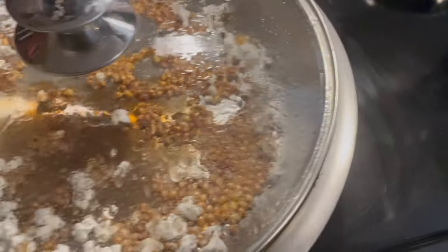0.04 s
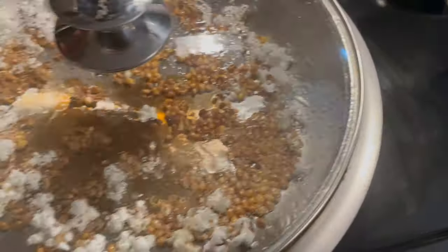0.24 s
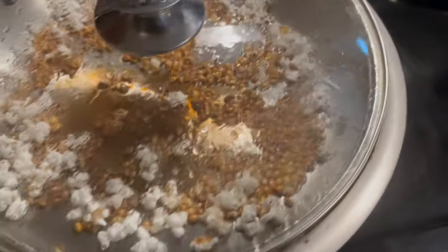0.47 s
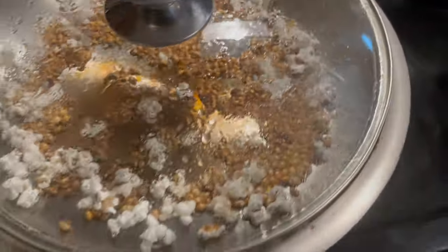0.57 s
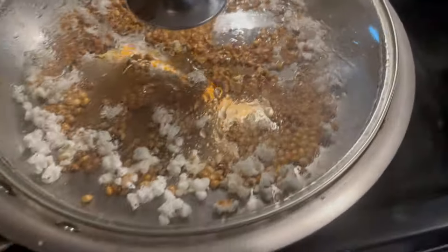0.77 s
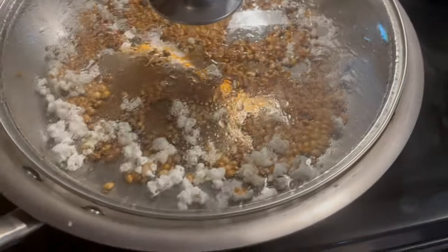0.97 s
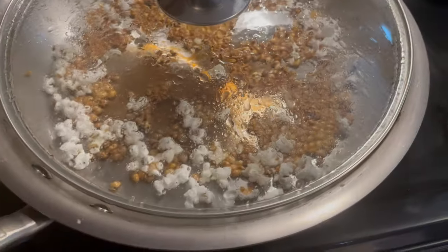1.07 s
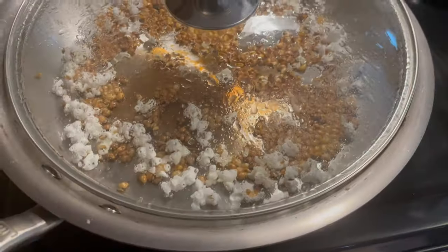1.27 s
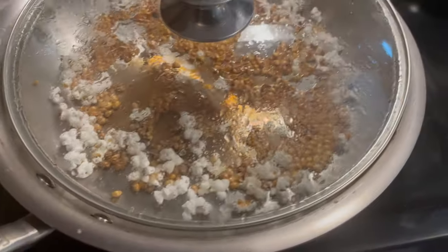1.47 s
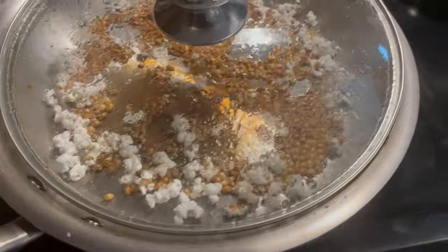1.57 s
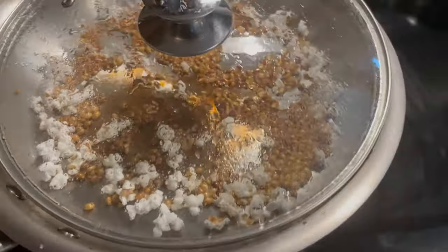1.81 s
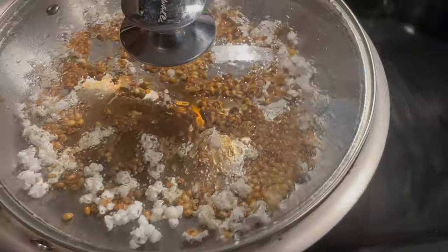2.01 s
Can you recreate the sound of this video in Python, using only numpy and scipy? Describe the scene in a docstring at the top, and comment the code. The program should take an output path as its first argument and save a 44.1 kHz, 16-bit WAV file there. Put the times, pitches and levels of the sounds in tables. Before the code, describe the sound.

Popcorn popping in a covered pan, a few crisp cracks with low thumps over faint hissing.

```python
"""Thin steam squeals over sizzling oil and a faint hum, then popcorn pops in a pan under a glass lid.
Sizzle is coloured noise with tiny bursts, squeals are narrow noise bands, spits are bright snaps with a fizz.
Each pop is a hull crack (clicks and a noise jet), a ring of pan modes and a low thump that drops in pitch.
Thrown kernels knock in quick ticks. A short kitchen tail follows; a close pair of microphone ports gives stereo."""
import sys
import numpy as np
from scipy import signal
from scipy.fft import rfft, irfft
from scipy.io import wavfile

SR = 44100
rng = np.random.default_rng(int(sys.argv[2]) if len(sys.argv) > 2 else 0)


def transcribe(u):
    """Save the signal u as a 16-bit wav file named by the first command-line argument.

    u: samples, shape (n,) or (channels, n), limited to [-1, 1]; the rate is SR.
    q: integer samples, one column per channel.
    """
    v = np.clip(np.atleast_2d(u).T, -1, 1)
    q = np.round(v * 32767).astype(np.int16)
    wavfile.write(sys.argv[1], SR, q)


N = 90404

# Modes of the covered pan. Each row: frequency in Hz, level in dB, t60 in seconds before the length factor.
PAN_MODES = [(1106, -2, .07), (1703, -4.5, .085), (2273, -2.5, .125), (2800, -8, .07), (3230, -11, .06),
             (3410, -9, .09), (3527, -7, .14), (3966, -9, .13), (4061, -4, .08), (4400, -11, .1),
             (4674, -7, .08), (4930, -10, .08), (5260, -9, .08), (5860, -13, .08), (6547, -8, .1),
             (7150, -11, .08)]
# Colour of tearing hulls and sizzle bursts. Each row: frequency in Hz, level in dB.
CRACK_COLOUR = [(200, -4), (500, -8.5), (780, -10.5), (1100, -1), (1400, -11), (2500, -5.5), (4500, -4.5),
                (5800, -3), (7600, -1.5), (10000, -0.5), (12500, 1), (14500, -5), (16500, -20)]


def amp(db):
    """Decibels to gain."""
    return 10 ** (np.asarray(db) / 20)


def evened(x):
    """Scales to an rms of 1."""
    return x / np.sqrt(np.mean(x ** 2) + 1e-20)


def read(points, hz, axis=1):
    """Interpolates one column of a table along log frequency."""
    table = np.transpose(points)
    return np.interp(np.log(hz + 1), np.log(table[0] + 1), table[axis])


def add(mix, s, sound):
    """Lays a sound into the mix at a time in seconds."""
    part = mix[:, max(round(s * SR), 0):][:, :sound.shape[-1]]
    part += sound[..., :part.shape[-1]]


def colour(x, db_of):
    """Filters by a dB function of frequency, with zero phase."""
    size = x.shape[-1]
    return irfft(rfft(x) * amp(db_of(np.fft.rfftfreq(size, 1 / SR))), size)


def times(size=8192):
    """The time axis of one short event, in seconds."""
    return np.arange(size) / SR


def burst(t, rise_s, fade_s):
    """Linear rise, exponential fade."""
    rise = np.minimum(t / max(rise_s, 1e-5), 1)
    return rise * np.exp(-np.maximum(t - rise_s, 0) / fade_s)


def ripple(size=8192):
    """A random ripple in dB over frequency: the reflections from one place between pan and lid."""
    ripple_db, spacing_hz = 0.5, 170.4
    hz = np.fft.rfftfreq(size, 1 / SR)
    knots = rng.standard_normal(1024)
    return ripple_db * np.interp(hz / spacing_hz, np.arange(len(knots)), knots)


def kitchen(x):
    """A faint room tail of decaying noise, each band dying at its own speed."""
    # Each row: frequency in Hz, t60 in seconds.
    room_t60 = [(100, 0.17), (400, 0.22), (2300, 0.45), (5000, 0.33), (15000, .2)]
    tail_db, rise_s = -18, 0.013
    hz, t, z = signal.stft(rng.standard_normal((2, SR // 2)), SR, nperseg=256)
    decay = np.exp(-np.log(1000) * t / read(room_t60, hz)[:, None])
    tail = signal.istft(z * decay * np.minimum(t / rise_s, 1), SR)[1]
    tail = tail / np.linalg.norm(tail[0])
    return amp(tail_db) * signal.fftconvolve(x[:1], tail, axes=1)[:, :N]


def sizzle():
    """Steady hiss of hot oil with tiny bursts of uneven strength, and the kitchen's hum."""
    # Sizzle and kitchen air. Each row: frequency in Hz, density in dB per Hz.
    hiss_density = [(15, -112), (26, -71), (38, -72.5), (60, -65), (120, -85), (200, -77.5), (300, -79.5),
                    (420, -80.5), (620, -86), (900, -88.5), (1400, -93.5), (2000, -94), (2260, -91),
                    (2550, -95.5), (4000, -97), (6000, -98.5), (8200, -95.5), (10000, -96), (12800, -94),
                    (14000, -101.5), (15700, -101), (16100, -125)]
    # Each row: frequency in Hz, rms level in dB.
    hum_tones = [(59.6, -56), (199, -73), (398.4, -62)]
    grains_per_s, grains_db, scatter_db = 170, -69, 9.5
    hiss = np.sqrt(SR / 2) * colour(rng.standard_normal((2, N)), lambda hz: read(hiss_density, hz))
    strength = amp(scatter_db * np.minimum(rng.exponential(1, N), 4))
    grains = rng.standard_normal((2, N)) * strength * (rng.random(N) < grains_per_s / SR)
    fizz = amp(grains_db) * evened(colour(grains, lambda hz: read(CRACK_COLOUR, hz)))
    t, hum = times(N), 0
    for hz, db in hum_tones:
        hum = hum + np.sqrt(2) * amp(db) * np.sin(2 * np.pi * (hz * t + rng.random()))
    return hiss + fizz + hum * np.array([[1], [0]])  # hum in the shared part only


def squeals():
    """Steam leaks through splits in the hulls as thin, fuzzy whistles whose level sags."""
    # Each row: start in seconds, length in seconds, pitch in Hz, width at -6 dB in Hz, starting level in dB.
    whistles = [(0.013, .03, 6440, 150, -36.5), (0.032, 0.13, 6460, 120, -53),
                (0.008, 0.069, 5590, 200, -49.5), (.003, 0.069, 11950, 700, -48),
                (.003, .04, 14300, 900, -49), (.003, 0.071, 7870, 700, -49), (.2, 0.041, 14100, 700, -48),
                (.2, 0.028, 15400, 400, -45), (0.195, 0.063, 11800, 600, -47.5),
                (0.199, 0.088, 7900, 300, -43.5), (0.203, 0.081, 6350, 200, -50.5),
                (0.37, 0.14, 11750, 300, -47.5), (0.372, .11, 13600, 200, -57),
                (1.562, 0.05, 11750, 300, -50.5)]
    ramp_s, sag_db = 0.0033, -8
    out, t = np.zeros((2, N)), times()
    for s, length_s, pitch_hz, width_hz, db in whistles:
        def band(hz):
            return -20 * np.log10(1 + (2 * (hz - pitch_hz) / width_hz) ** 2)

        whistle = evened(colour(rng.standard_normal((2, len(t))), band))
        gate = np.clip(np.minimum(t, length_s - t) / ramp_s, 0, 1)
        add(out, s, whistle * gate * amp(db + sag_db * np.minimum(t / length_s, 1)))
    return out


def spits():
    """Oil bubbles snap and leave a short bright fizz."""
    # Each row: start in seconds, snap level in dB, fizz level in dB, fizz fade in seconds.
    bubbles = [(1.228, -47, -43, .012), (1.2561, -29.5, -40, 0.0046), (1.313, -31, -43.5, 0.013)]
    snap_s, fizz_rise_s, centre_hz, slope_db_per_octave = 0.00018, 0.002, 13000, 4
    out, t = np.zeros((2, N)), times()

    def bright(hz):
        return -slope_db_per_octave * abs(np.log2((hz + 1) / centre_hz))

    for s, snap_db, fizz_db, fade_s in bubbles:
        noise = evened(colour(rng.standard_normal((2, len(t))), bright))
        snap = amp(snap_db) * np.exp(-t / snap_s)
        fizz = amp(fizz_db) * burst(t, fizz_rise_s, fade_s)
        add(out, s, noise * (snap + fizz))
    return out


def pan_lift_db(hz, width_hz=60, lift_db=6):
    """The lift that the pan gives around each of its modes."""
    return lift_db * np.max([1 / (1 + ((hz - mode[0]) / width_hz) ** 2) for mode in PAN_MODES], 0)


def ring(db_of, length=1):
    """The covered pan rings; the place that is hit sets how strongly each mode answers."""
    rise_s, scatter_db, detune_ratio = 0.0042, 1.2, 0.001
    early_s, late_db = 0.0078, -5  # the heap of corn soaks up most of the ring at once
    t, out = times(), 0
    for hz, mode_db, t60_s in PAN_MODES:
        level, detune = rng.standard_normal(2)
        mode_hz = hz * (1 + detune_ratio * detune)
        wave = np.sin(2 * np.pi * (mode_hz * t + rng.random((2, 1))))
        gain = amp(mode_db + scatter_db * level + db_of(hz))
        out = out + wave * gain * np.exp(-np.log(1000) * t / (t60_s * length))
    return out * (burst(t, rise_s, early_s) + amp(late_db) * np.minimum(t / rise_s, 1))


def knocks():
    """Thrown kernels clatter on pan and lid in quick ticks and ring some modes of the pan."""
    # Each row: start in seconds, clatter level in dB, ring level in dB, centre in Hz,
    # half-width in octaves, rise in seconds, fade in seconds.
    hits = [(0.2346, -33.5, -50, 3700, 1.05, 0.002, 0.011), (.408, -46.5, -58, 4200, 0.88, 0.0026, 0.06),
            (0.5245, -40, -33.5, 3630, 0.88, .0005, .01), (.655, -48, -61, 2150, 0.64, 0.0034, 0.01),
            (1.5215, -41, -29.5, 3660, 0.48, 0.00076, 0.0053),
            (1.5440, -26, -36.5, 3130, 1.55, 0.0025, 0.011), (1.656, -61, -46.5, 2400, .7, 0.0018, .014),
            (1.7886, -42, -36, 5800, 1.2, 0.00034, 0.0042), (1.8140, -31, -33.5, 2430, 0.28, .0015, 0.0048),
            (1.854, -49, -52, 2280, 0.32, 0.0013, .01), (1.918, -51, -58, 2480, 1, .002, 0.013),
            (1.968, -49.5, -52, 2530, 0.54, .002, 0.014)]
    ticks_per_s, rub_db = 700, -24
    out, t = np.zeros((2, N)), times()
    for s, db, ring_db, centre_hz, half_octaves, rise_s, fade_s in hits:
        comb_db = ripple()

        def band(hz):
            return -10 * np.log10(1 + (np.log2((hz + 1) / centre_hz) / half_octaves) ** 6)

        strength = (rng.random(len(t)) < ticks_per_s / SR) + amp(rub_db)
        ticks = np.sign(rng.standard_normal((2, len(t)))) * strength
        clatter = evened(colour(ticks, lambda hz: band(hz) + pan_lift_db(hz) + comb_db))
        clatter = clatter * burst(t, rise_s, fade_s)
        add(out, s, amp(db) * clatter + amp(ring_db) * ring(band))
    return out


def crack(snap_db, db, swell_s, fade_s, treble_db, hull_hz, hull_db):
    """The hull snaps, then tears in a run of clicks with a jet of steam, which scatters under the lid."""
    clicks_per_s, click_share = 1700, 0.74
    snap_s, hull_octaves = 0.00048, 0.18
    rattle_db, rattle_fade_s = -6, 0.0063  # scatter between pan and lid
    t, comb_db = times(), ripple()
    jet, grain, scatter = rng.standard_normal((3, 2, len(t)))
    clicks = evened(np.sign(grain) * (rng.random(len(t)) < clicks_per_s / SR))

    def tone(hz):
        tilt = treble_db * np.log2(np.maximum(hz, 1000) / 6000)
        hull = hull_db / (1 + (np.log2((hz + 1) / hull_hz) / hull_octaves) ** 2)
        return read(CRACK_COLOUR, hz) + comb_db + tilt + hull

    snap = evened(colour(jet[:, ::-1], tone)) * burst(t, snap_s, snap_s)
    tear = evened(colour(np.sqrt(click_share) * clicks + np.sqrt(1 - click_share) * jet, tone))
    tear = tear * burst(t, swell_s, fade_s)
    rattle = evened(colour(scatter, tone)) * burst(t, swell_s + fade_s, rattle_fade_s)
    return amp(snap_db) * snap + amp(db) * (tear + amp(rattle_db) * rattle)


def thump(treble_db, size=8192):
    """The push of the swelling kernel booms in the pan; the bass lags, so the pitch drops."""
    # Each row: frequency in Hz, level in dB.
    boom_colour = [(30, -51), (60, -18.5), (85, -8.5), (125, -7.5), (155, -12), (200, -6.5), (255, -4.5),
                   (304, 2.5), (348, -8.5), (420, -17.5), (530, -19.5), (620, -58), (1500, -67)]
    lag_s, pivot_hz = 0.00458, 298  # the lag at the pivot; lower parts lag more
    hz = abs(np.fft.fftfreq(size, 1 / SR))
    shape_db = read(boom_colour, hz) + treble_db * np.log2(np.clip(hz, 30, 1000) / pivot_hz)
    causal = np.exp(signal.hilbert(shape_db * np.log(10) / 20).conj())  # minimum phase
    lag = np.exp(-4j * np.pi * lag_s * np.sqrt(pivot_hz * hz))
    wave = irfft((causal * lag)[:size // 2 + 1])
    return wave / abs(wave).max()


def pops():
    """Each kernel cracks its hull, rings the pan and thumps as it swells."""
    # Each row: start in seconds, first snap level in dB, crack level in dB, swell in seconds, jet fade in
    # seconds, crack treble in dB per octave, hull resonance in Hz, hull lift in dB, ring level in dB,
    # ring treble in dB per octave, ring length factor, favoured ring in Hz, its lift in dB,
    # thump delay in seconds, thump level in dB, thump treble in dB per octave, thump length in seconds.
    kernels = [(0.245, -32, -13, 0.0041, .0024, -0.5, 7300, 11.5, -27, 0.5, 0.93, 3920, 9.5, .0005, -20.5, 0, 0.011),
               (0.3345, -22, -22.5, 0.00047, 0.0073, 0, 6400, 2, -32, 0.5, 1.3, 1900, 4.5, -.0007, -17, -1.5, 0.031),
               (0.494, -13, -17.5, 0.0014, 0.0041, 1.5, 4600, 4.5, -33, 5, 1.2, 1050, 13.5, -0.0016, -10.5, 0, 0.031),
               (0.5378, -6, -11, 0.0013, 0.0042, -0.5, 5600, 6.5, -23, -4, 1.1, 2260, 2, 0.0022, -9.5, 3.5, 0.025),
               (1.4086, -11, -20.5, 0.0015, 0.0033, 0, 870, 9.5, -23, -0.5, 0.76, 2760, 1, -0.00074, -15.5, 1.5, 0.041),
               (1.4971, -16, -24, 0.00054, 0.0082, -0.5, 7050, 11, -34.5, 1.5, 0.72, 1100, 13.5, -.0014, -14, 2.5, 0.07),
               (1.792, -20, -20, 0.0018, 0.0023, 0, 9500, 5, -40.5, 4.5, 1.8, 4340, 3, -0.0002, -22, -2.5, 0.033)]
    favoured_octaves = 0.38
    out = np.zeros((2, N))
    for (s, *hull, ring_db, ring_treble_db, ring_length, favoured_hz, lift_db,
         delay_s, thump_db, thump_treble_db, thump_s) in kernels:
        def place(hz):
            favoured = np.exp(-(np.log2(hz / favoured_hz) / favoured_octaves) ** 2)
            return ring_db + ring_treble_db * np.log2(hz / 3000) + lift_db * favoured

        add(out, s, crack(*hull) + ring(place, ring_length))
        boom = thump(thump_treble_db) / (1 + (times() / thump_s) ** 4)
        add(out, s + delay_s, amp(thump_db) * boom * np.array([[1], [0]]))  # shared part only
    return out


def ports(x, bias=1, power=1):
    """Turns a shared and an unrelated part into left and right; the pan lies nearer the left port."""
    # Each row: frequency in Hz, left lead in radians, likeness (0 to 1) before the power,
    # left minus right in dB before the bias.
    port_points = [(100, 0, 0.96, 3.5), (357, 0.45, 0.94, 1.5), (650, .5, 0.69, 4), (1020, 1.07, 0.82, 7),
                   (1760, -1.27, 0.57, 6.5), (2346, 0.42, 0.85, 6.5), (3300, 1.83, 1, 6),
                   (5100, 0.64, 0.93, 2), (5280, -1.1, 1, 6), (6720, -1.5, 0.75, 0.5), (7480, -2, 0.85, 4),
                   (8520, -3.5, 1, -1), (10850, -4.5, 1, 2.5), (13840, -6, 1, -1.5), (17300, -1.5, .99, 23)]
    hz = np.fft.rfftfreq(N, 1 / SR)
    shared, other = rfft(x)
    lead = read(port_points, hz, axis=1)
    like = np.clip(read(port_points, hz, axis=2), 0, 1) ** power
    left_db = read(port_points, hz, axis=3)
    right = like * shared + np.sqrt(1 - like ** 2) * other
    right = right * np.exp(-1j * lead) * amp(-bias * left_db)
    return irfft(np.array([shared, right]), N)


def scene():
    """The pan with its room tail, over the steady sizzle, which is wider and less to the left."""
    pan = pops() + knocks() + spits() + squeals()
    return ports(pan + kitchen(pan)) + ports(sizzle(), bias=0.2, power=3.7)


def record(dry):
    """A steep low cut and a band limit."""
    low_cut_hz, edge_hz = 33, 16700
    dry = colour(dry, lambda hz: -10 * np.log10(1 + (low_cut_hz / (hz + 1)) ** 16))
    low_pass = signal.firwin(255, edge_hz, window=("kaiser", 9), fs=SR)
    return signal.oaconvolve(dry, low_pass[None], "same")


dry = scene()
out = record(dry)
transcribe(out)
```